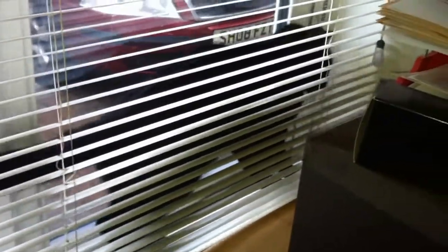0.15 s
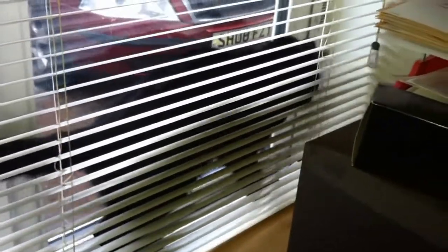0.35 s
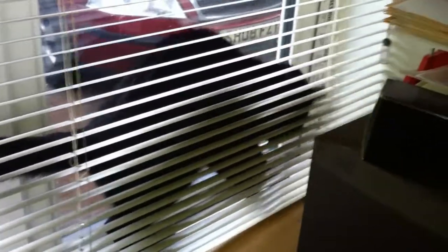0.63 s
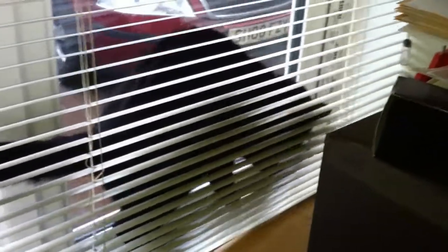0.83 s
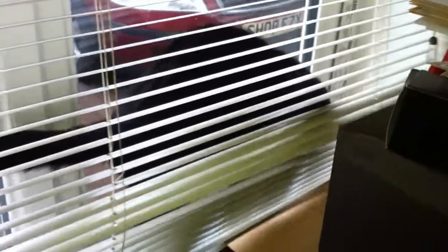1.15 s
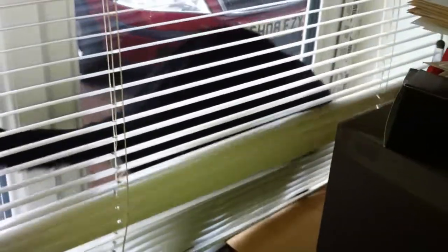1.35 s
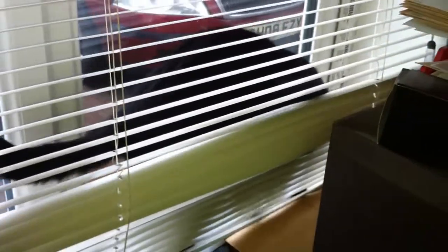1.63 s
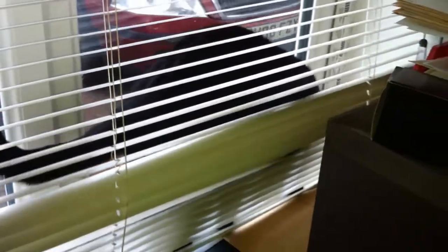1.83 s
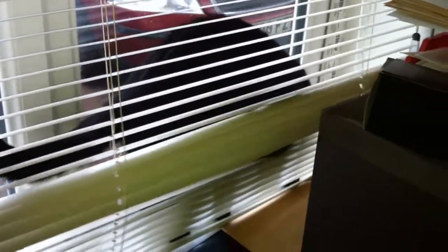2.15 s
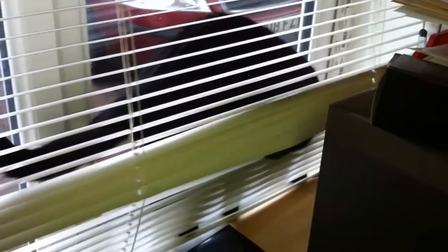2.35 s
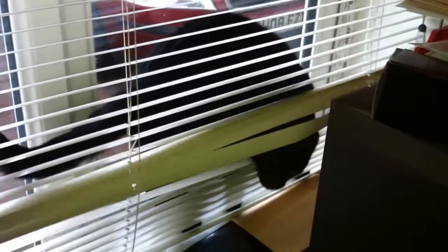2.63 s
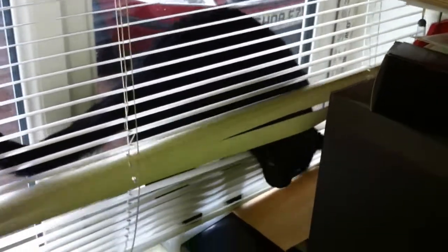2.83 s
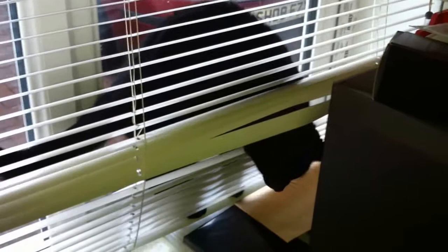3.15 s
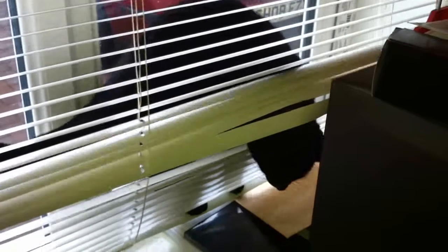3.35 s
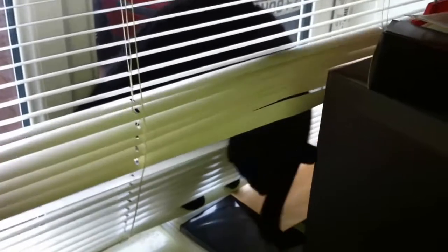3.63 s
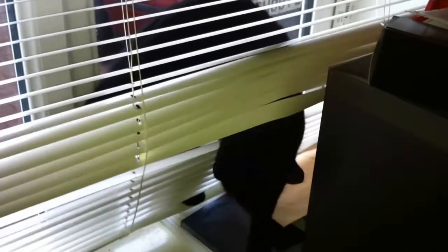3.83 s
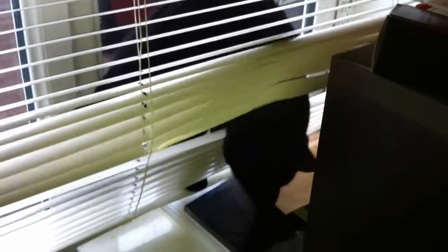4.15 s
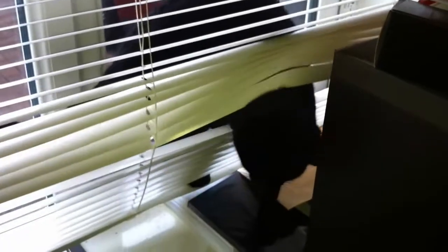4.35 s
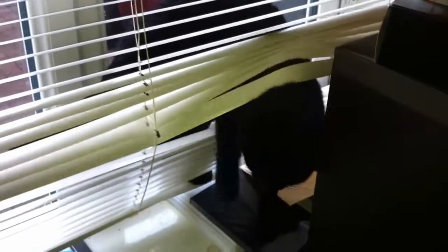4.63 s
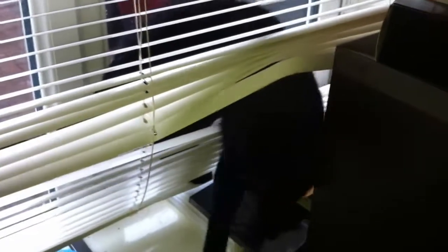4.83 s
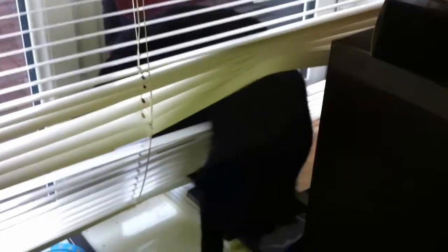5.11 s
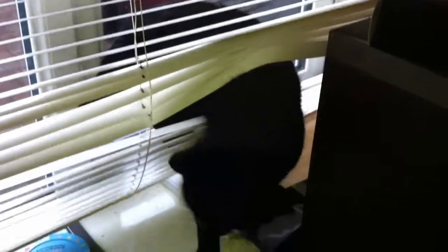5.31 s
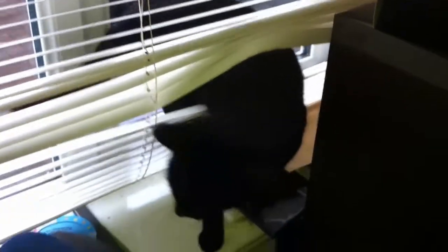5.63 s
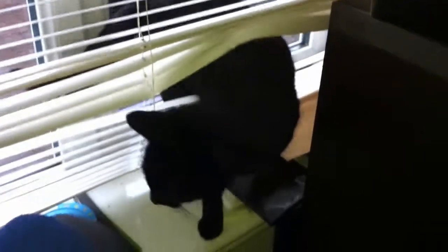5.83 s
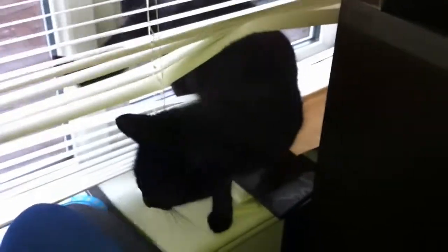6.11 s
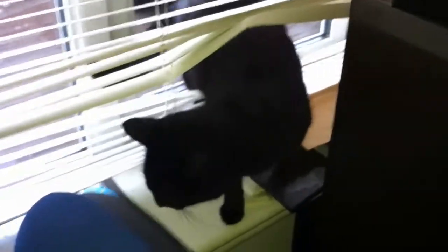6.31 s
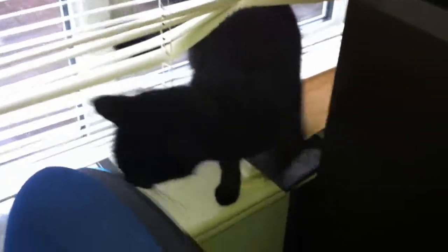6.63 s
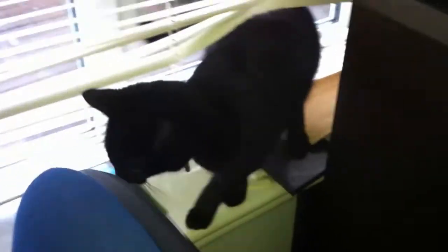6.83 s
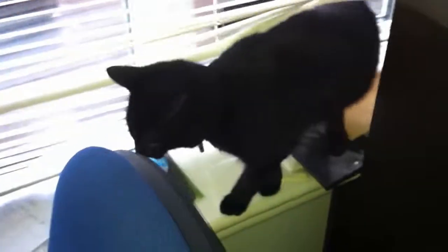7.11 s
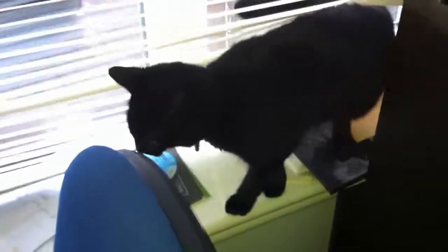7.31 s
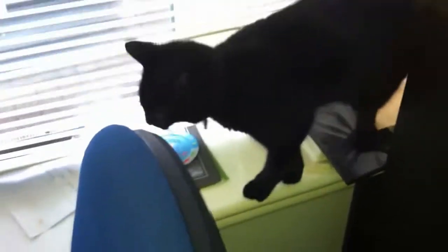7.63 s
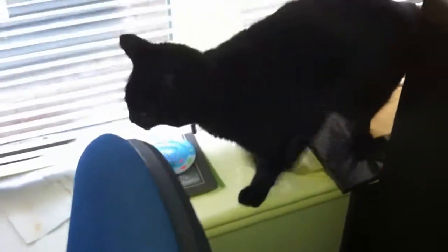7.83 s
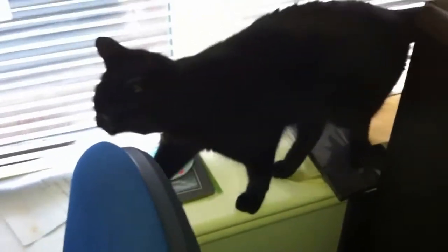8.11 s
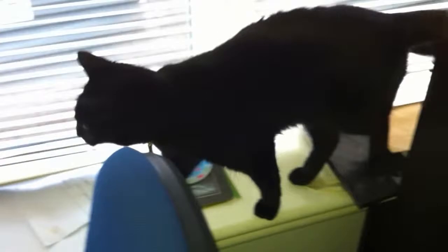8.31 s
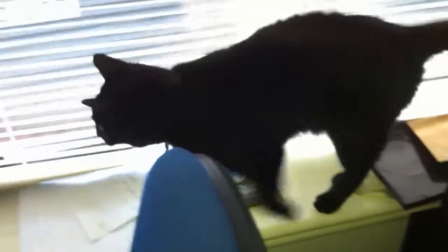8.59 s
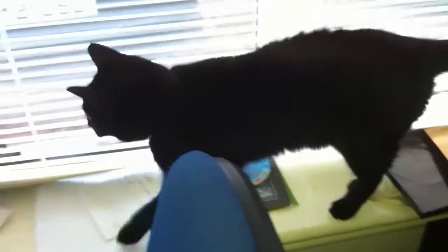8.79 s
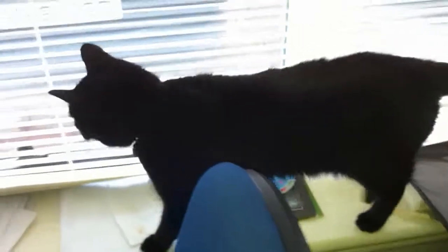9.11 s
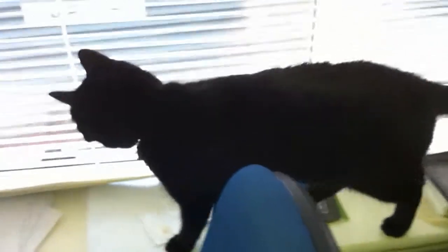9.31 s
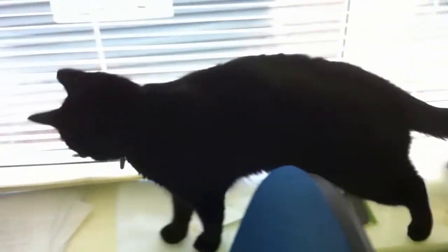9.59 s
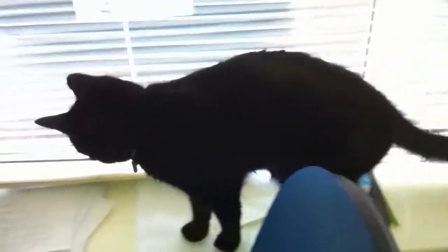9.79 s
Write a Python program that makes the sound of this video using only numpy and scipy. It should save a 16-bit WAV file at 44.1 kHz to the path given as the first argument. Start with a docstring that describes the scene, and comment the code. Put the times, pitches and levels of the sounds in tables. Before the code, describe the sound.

Close, thin metallic rattling and rough sliding of window blind slats, wooden bumps, then one sharp double clatter as a cat steps free indoors.

```python
"""Cat squeezing through a metal blind

A cat squeezes through a metal blind on a window sill and steps down onto a desk, heard close up and in mono.
Bent slats slide over its fur and each other (rough noise), snap back and ring (bursts through resonances).
The blind's rail and the paws knock on wood, and a thin whistle glides now and then.
A small room answers these sounds, over a low steady hush of filtered noise."""
import sys
import numpy as np
from scipy import signal
from scipy.fft import rfft, irfft
from scipy.io import wavfile
from scipy.ndimage import uniform_filter1d

SR = 44100
rng = np.random.default_rng(int(sys.argv[2]) if len(sys.argv) > 2 else 0)


def inscribe(sig):
    """Save sig as 16-bit PCM at rate SR to the path in sys.argv[1].

    A 1-D sig is mono; a 2-D sig holds one channel per row.
    Samples are clipped to [-1, 1] before scaling.
    """
    pcm = np.round(np.clip(np.atleast_2d(sig).T, -1, 1) * 32767)
    wavfile.write(sys.argv[1], SR, pcm.astype(np.int16))


N = 438794
TIME = np.arange(N) / SR  # seconds, whole scene
HIT = TIME[:SR // 2]  # seconds, one blow
ATTACK = int(.03 * SR)  # samples at the start of a blow that set its loudness


def amp(db):
    """Turn decibels into a gain."""
    return 10 ** (np.asarray(db) / 20)


def unit(x, size=None):
    """Scale to an average strength (rms) of 1, judged on the first `size` samples."""
    return x / np.sqrt(np.mean(x[:size] ** 2) + 1e-18)


def colour(x, points):
    """Filter x to the given (Hz, dB) outline, without any sound arriving early."""
    size = 4096
    hz, db = np.transpose(points)
    bins = np.maximum(np.fft.rfftfreq(size, 1 / SR), 1)
    outline_db = np.interp(np.log(bins), np.log(hz), db)
    # folding the cepstrum forward gives the minimum-phase filter
    cepstrum = irfft(np.log(amp(outline_db)))
    cepstrum[1:size // 2] *= 2
    cepstrum[size // 2 + 1:] = 0
    response = irfft(np.exp(rfft(cepstrum)))
    return signal.fftconvolve(x, response)[:len(x)]


def resonate(x, hz, t60):
    """Drive one resonance with x; it falls by 60 dB in t60 seconds."""
    pole = np.exp((2j * np.pi * hz - np.log(1000) / t60) / SR)
    return signal.lfilter([1], [1, -pole], x).real


def walk(rate, size=N):
    """Smooth random drift at rms 1, with `rate` new random values a second."""
    k = int(SR / rate)
    steps = np.repeat(rng.standard_normal(size // k + 1), k)
    smooth = uniform_filter1d(uniform_filter1d(steps, k), k)
    return unit(smooth[:size])


def grains(size, spread_db):
    """A dense run of tiny contacts of uneven strength."""
    strength_db = spread_db * np.minimum(rng.standard_normal(size), 2)
    return unit(rng.standard_normal(size) * amp(strength_db))


def chatter(rise_s, t60, first_db, flight_s=0):
    """A blow: a hard first contact, any flight, then a burst of contacts that dies away unevenly."""
    after = np.maximum(HIT - flight_s, 0)
    decay = amp(-60 * after / t60 + 2 * walk(297, size=len(HIT)))
    burst = (1 - np.exp(-after / rise_s)) * decay
    first = amp(first_db) * np.exp(-HIT / 0.0018)
    return grains(len(HIT), spread_db=2.0) * (burst + first)


def struck(blow, outline, hz, t60, mode_db):
    """A struck object: a broad response with one resonance standing out, at rms 1 during the attack."""
    broad = unit(colour(blow, outline), ATTACK)
    mode = unit(resonate(broad, hz, t60), ATTACK)
    return unit(broad + amp(mode_db) * mode, ATTACK)


def slips(rate, decay_s):
    """Stick and slip: strength jumps about `rate` times a second and relaxes after each jump."""
    jumps = (rng.random(N) < rate / SR) * rng.uniform(0.4, 1, N)
    return unit(signal.lfilter([1], [1, -np.exp(-1 / (decay_s * SR))], jumps))


def add(track, s, sound):
    """Mix a sound into the track at time s in seconds."""
    start = max(int(s * SR), 0)
    track[start:start + len(sound)] += sound[:N - start]


# Tone of the low hush. Each row: frequency in Hz, relative level in dB.
HUSH_TONE = [(25, -6), (60, -48), (100, -7), (160, 0.5), (280, 3), (450, -2.5), (560, -6), (1500, -8),
             (3000, -13), (9500, -15)]


def background():
    """A low hush of filtered noise, with a faint wavering hum where the noise drives a resonance."""
    noise = rng.standard_normal(N)
    hush = amp(-51) * unit(colour(noise, HUSH_TONE))
    hum = amp(-67.5) * unit(resonate(noise, hz=556.0, t60=0.15))
    return hush + hum


# Broken-off glides of a faint thin whistle.
# Each row: level in dB before the flicker, then the pitch curve as pairs of time in seconds and pitch in Hz.
WHISTLE_GLIDES = [(-61, [(8.47, 2670), (8.59, 2810)]), (-58, [(8.64, 2810), (8.72, 2890)]),
                  (-55.5, [(8.73, 2650), (8.835, 2480), (8.93, 2680)]), (-63, [(8.93, 2440), (9.22, 2286),
                  (9.53, 2690)])]


def whistle():
    """A thin wavering sine tone that glides, flickers and fades at both ends."""
    out = np.zeros(N)
    waver = 1 + 0.00564 * walk(90)
    flicker = amp(2 * walk(60))
    for db, glide in WHISTLE_GLIDES:
        s, hz = np.transpose(glide)
        progress = np.clip((TIME - s[0]) / (s[-1] - s[0]), 0, 1)
        swell = np.sqrt(np.abs(np.sin(np.pi * progress)))
        pitch = np.interp(TIME, s, hz) * waver
        out += amp(db) * swell * np.sin(2 * np.pi * np.cumsum(pitch) / SR)
    return flicker * out


# The slats' lasting ring. Each row: frequency in Hz, time to fall by 60 dB in seconds.
SLAT_RINGS = [(1628, 0.25), (1672, 0.083)]


def slat_ring(drive, size=None):
    """Neighbouring slats ring at nearly the same pitch and beat; rms 1 over the first `size` samples."""
    rings = [unit(resonate(drive, hz, t60)) for hz, t60 in SLAT_RINGS]
    return unit(sum(rings), size)


# How hard the cat presses along the blind. Each row: time in seconds, sliding level in dB.
SLIDE_PRESSURE = [(0, -56), (.3, -71), (1.45, -56), (2.3, -62), (2.6, -56.5), (3.35, -56), (3.72, -48),
                  (4.1, -53.5), (5.0, -51), (5.25, -57), (5.75, -60), (6.75, -51.5), (7.2, -55.5),
                  (7.85, -53.5), (8.3, -60.5), (9.2, -71)]
# Slats dragged over each other.
# Each row: middle in seconds, length in seconds, level in dB, sizzle in dB relative to that level.
DRAGS = [ (0.147, 0.056, -50.5, 8.5), (1.466, 0.089, -49, 4.5), (2.557, 0.083, -44, -1),
         (2.738, 0.24, -52, 5.5), (3.11, 0.17, -52.5, 7.5), (3.62, 0.027, -40, 0), (4.582, 0.023, -49, -4),
         (4.728, 0.12, -53, -9), (4.882, 0.035, -43, -7), (4.991, 0.056, -39.5, -3),
         (5.076, 0.04, -41, 1.5), (5.535, 0.077, -46, 3), (6.98, 0.013, -42, -14), (7.365, 0.033, -48.5, 0),
         (7.873, 0.064, -39.5, 10.5), (7.986, 0.025, -24.5, 5), (8.924, 0.059, -51, 1.5),
         (9.854, 0.031, -55.5, -8)]
# Tone of metal slats, also used for their blows: the clattering edges, the fine sizzle,
# the broad clang and the flexing of the whole blind. Each row: frequency in Hz, relative level in dB.
CLATTER_TONE = [(1500, -24), (2300, -7.5), (3700, 4), (4400, 4.5), (6400, -1), (8200, 2), (10000, -23.5),
                (12000, -18.5)]
SIZZLE_TONE = [(6500, -53), (9000, -4), (11700, 2.5), (16000, -3)]
CLANG_TONE = [(700, -17.5), (1200, 1), (1950, 5), (2360, 2), (2680, -5.5), (3400, -37.5)]
FLEX_TONE = [(30, -42), (110, -14.5), (320, 12), (520, 4), (800, 7), (1400, 11.5), (2000, -10.5),
             (4000, -55.5)]


def sliding():
    """Slat edges catch on fur and on each other; the friction hisses and keeps the metal humming."""
    slide = amp(np.interp(TIME, *np.transpose(SLIDE_PRESSURE)))
    catch = unit(1 + 0.62 * slips(rate=33, decay_s=0.029))
    # power of the clattering body and of the sizzling top
    body = (slide * catch) ** 2
    top = (slide * amp(3.5)) ** 2 * catch
    # a stroke is a quick run of small rubs
    rub = unit(1 + 1.2 * slips(rate=130, decay_s=0.005)) ** 2
    for s, length, db, top_db in DRAGS:
        stroke = rub * np.exp(-(2 * (TIME - s) / length) ** 2)
        body = body + stroke * amp(db) ** 2
        top = top + stroke * amp(db + top_db) ** 2
    friction = grains(N, spread_db=5.5)
    # among the fine grains, single edges let go with a tick, about 60 a second
    releases = (rng.random(N) < 60 / SR) * rng.uniform(-0.84, 1, N)
    edges = amp(-11) * unit(colour(releases, CLATTER_TONE))
    # a fast stroke skims the edge, so the ring grows only so far
    grip = np.minimum(np.sqrt(body), amp(-43.5))
    ring = amp(-8.0) * slat_ring(friction)
    clang = amp(-4.0) * unit(colour(friction, CLANG_TONE))
    sway = amp(-1.5) * unit(colour(friction, FLEX_TONE))
    rough_hiss = np.sqrt(body) * unit(colour(friction, CLATTER_TONE))
    fine_hiss = np.sqrt(top) * unit(colour(friction, SIZZLE_TONE))
    return rough_hiss + fine_hiss + grip * (ring + clang) + slide * (sway + edges)


# The rail and the paws hitting wood.
# Each row: start in seconds, blow level in dB (halved in the mix), boom pitch in Hz,
# then thump and hard contact, both in dB relative to the blow.
WOOD_KNOCKS = [ (1.248, -28.5, 351, -12, -6.5), (1.276, -27, 365, -16, -6.5), (1.304, -31.5, 368, -28, -10),
               (1.580, -34.5, 465, -7, 0.5), (1.882, -30, 205, -14, -12), (1.933, -35, 325, -20, -9),
               (2.668, -26, 276, -2.5, 0), (2.691, -29.5, 265, -9, 9), (2.725, -29, 266, -11, -26),
               (3.008, -21.5, 370, -25, -4), (3.031, -32.5, 316, -13, 2.5), (3.23, -36, 335, -8.5, -15),
               (3.582, -32, 380, -13, -10.5), (3.754, -30.5, 370, -8, -1.5), (4.667, -36, 382, -9, -3),
               (4.929, -39, 334, -20, -8), (6.590, -33.5, 460, -2, -0.5), (6.779, -43, 422, -3, -0.5),
               (6.872, -42.5, 421, -1.5, 3), (7.474, -41.5, 460, -1, 7), (7.854, -51.5, 209, 12, -16),
               (8.186, -24, 276, -23, -12.5), (8.535, -39.5, 282, -8.5, -12), (8.904, -47, 390, -1, 10)]
# Tone of each part of a knock: deep thump, boom, hollow knock, dry clack and sharp crack.
# Each row: frequency in Hz, relative level in dB.
THUMP_TONE = [(90, -35), (135, -9.5), (175, 10.5), (240, -5), (400, -52)]
BOOM_TONE = [(110, -44), (170, 1), (360, 1), (470, -7.5), (700, -35)]
KNOCK_TONE = [(350, -22), (530, 4), (780, -2.5), (1050, -7.5), (1500, -45)]
CLACK_TONE = [(850, -32), (1150, 4), (1350, 2.5), (1620, 2), (2200, -9.5), (3000, -17.5), (9000, -44)]
CRACK_TONE = [(1200, -13), (2100, -2), (11000, -19)]
# the hollow knock lies about an octave over the boom; a higher-pitched spot clacks more
KNOCK_RATIO, CLACK_DB, CLACK_AT_HZ, CLACK_DB_PER_OCTAVE = 2.1, -4, 361, 13
# a stiff, high-pitched spot gives a shorter blow with a sharp crack
STIFF_ABOVE_HZ, CRACK_DB = 420, -3


def knocks():
    """Blows on wood thump, boom, knock and clack, pitched by the spot that is hit; stiff spots crack."""
    out = np.zeros(N)
    for s, db, boom_hz, thump_db, hard_db in WOOD_KNOCKS:
        # a light paw settles slowly, a heavy blow lands at once
        strength_db = db + max(hard_db, 0)
        rise_s = np.clip(0.0012 * amp(-1.1 * (strength_db + 31)), .0012, .02)
        stiff = boom_hz > STIFF_ABOVE_HZ
        blow = chatter(rise_s, t60=0.105 if stiff else 0.145, first_db=3 if stiff else -5)
        thump = amp(thump_db) * unit(colour(blow, THUMP_TONE), ATTACK)
        boom = struck(blow, BOOM_TONE, boom_hz, t60=0.037, mode_db=1.5)
        knock = struck(blow, KNOCK_TONE, KNOCK_RATIO * boom_hz, t60=0.014, mode_db=4.5)
        clack_db = CLACK_DB + CLACK_DB_PER_OCTAVE * np.log2(boom_hz / CLACK_AT_HZ)
        clack = amp(clack_db) * unit(colour(blow, CLACK_TONE), ATTACK)
        crack = stiff * amp(CRACK_DB) * unit(colour(blow, CRACK_TONE), ATTACK)
        hard = amp(hard_db) * (knock + clack + crack)
        add(out, s, amp(db) / 2 * (thump + boom + hard))
    return out


# Bending modes of a slat.
# Each row: frequency in Hz at pitch ratio 1, relative level in dB, time to fall by 60 dB in seconds.
SLAT_MODES = [(912, -7.5, 0.026), (1926, 5.5, 0.038), (2135, -2, 0.074), (3380, -4.5, .06),
              (3950, -2, 0.045), (6520, -14, .06), (7600, -6, .05)]


def slat_clang(blow, pitch):
    """The bent span clangs, a broad note plus bending modes; it is caught again at once, which damps it."""
    drive = blow * np.exp(-HIT / 0.023)
    modes = sum(amp(db) * unit(resonate(drive, hz * pitch, t60), ATTACK) for hz, db, t60 in SLAT_MODES)
    broad = unit(colour(drive, CLANG_TONE), ATTACK)
    return unit(broad + amp(-3.5) * unit(modes, ATTACK), ATTACK)


# Slats tapping lightly in place.
# Each row: start in seconds, clatter level in dB, sizzle in dB relative to the clatter.
LIGHT_TAPS = [ (0.043, -51, -1), (0.567, -46, -7), (0.755, -53.5, -12), (0.933, -56.5, 2),
              (1.285, -52.5, -12), (1.405, -52, 3), (2.035, -49, -11), (2.397, -46.5, -16),
              (2.528, -50, -12), (3.522, -43, -2), (3.814, -54, 14), (4.939, -50, -9), (5.429, -46.5, 7.5),
              (6.696, -48.5, 8), (7.523, -46, 4.5), (9.757, -51.5, -14)]


def ticks():
    """A slat that stays in place taps its neighbour: no flight, a short chatter and a little ring."""
    out = np.zeros(N)
    for s, db, sizzle_db in LIGHT_TAPS:
        blow = chatter(rise_s=0.0017, t60=0.14, first_db=-2.5)
        metal = amp(-8.5) * (slat_ring(blow, ATTACK) + slat_clang(blow, 1))
        clatter = unit(colour(blow, CLATTER_TONE), ATTACK)
        sizzle = amp(sizzle_db) * unit(colour(blow, SIZZLE_TONE), ATTACK)
        add(out, s, amp(db) * (clatter + sizzle + metal))
    return out


# Slats snapping together.
# Each row: start in seconds, clatter level in dB, then clang, ring and sizzle in dB relative to the clatter,
# first contact in dB relative to the burst after it, and pitch ratio of the bent span.
SNAPS = [ (1.165, -39, -16, -7, -8, 11, 0.71), (1.671, -34, -10, -7, -4.5, -10, 1.2),
         (3.653, -24, 1.5, -9.5, -2.5, 8.5, 0.99), (4.220, -48.5, 3, -16, -14, 7, 1),
         (4.3245, -31.5, 7, -4, -3, -6, 1.01), (5.402, -37.5, -0.5, -6.5, -2, -1, 0.73),
         (6.366, -37.5, -6.5, -12, 3.5, -1, 0.79), (6.991, -30, 2, -6.5, -1, 0, 1.02),
         (7.472, -44, -3, -2, 0, -4, 1), (7.973, -22.5, -2, -12.5, 3.5, -10, 1.104),
         (8.0414, -23.5, -21, -25, 0, 11.5, 0.81), (8.321, -37, -7, -3, -4.5, -2, 1),
         (9.658, -35, -8.5, -5, -4.5, -8, 1.05)]
FLIGHT_S = 0.0038  # seconds between a slat's first tap and its full landing
# while the blind lies bent over the cat's back (from s, to s), each landing flexes all of it;
# the flex levels are relative to the clatter
BENT_S, FLEX_BENT_DB, FLEX_FREE_DB = (3.6, 6.8), -2, -18
# a slat caught on its stiff edge hardly clangs; instead a bright resonance stands out
EDGE_BELOW_CLANG_DB, EDGE_HZ, EDGE_DB = -19.5, 6670, 15


def clicks():
    """A slat slips free, taps its neighbour, clangs and chatters against it, then rings on."""
    out = np.zeros(N)
    for s, db, clang_db, ring_db, sizzle_db, first_db, pitch in SNAPS:
        blow = chatter(rise_s=0.0014, t60=0.14, first_db=first_db, flight_s=FLIGHT_S)
        if clang_db < EDGE_BELOW_CLANG_DB:
            clatter = struck(blow, CLATTER_TONE, EDGE_HZ, t60=0.0022, mode_db=EDGE_DB)
        else:
            clatter = unit(colour(blow, CLATTER_TONE), ATTACK)
        sizzle = amp(sizzle_db) * unit(colour(blow, SIZZLE_TONE), ATTACK)
        flex_db = FLEX_BENT_DB if BENT_S[0] < s < BENT_S[1] else FLEX_FREE_DB
        landing = blow * (HIT > FLIGHT_S)
        flex = amp(flex_db) * unit(colour(landing, FLEX_TONE), ATTACK)
        clang = amp(clang_db) * slat_clang(blow, pitch)
        ring = amp(ring_db) * slat_ring(blow, ATTACK)
        add(out, s, amp(db) * (clatter + sizzle + flex + clang + ring))
    return out


def room(x, wet_db, t60_low, t60_high):
    """Diffuse reflections of a small furnished room, as fading noise; the treble dies first."""
    noise = rng.standard_normal(len(HIT))
    low = signal.sosfilt(signal.butter(1, 5000, fs=SR, output="sos"), noise)
    high = noise - low
    fading = low * amp(-60 * HIT / t60_low) + high * amp(-60 * HIT / t60_high)
    tail = fading * (1 - np.exp(-HIT / 0.014))
    return x + amp(wet_db) * signal.fftconvolve(x, tail / np.linalg.norm(tail))[:N]


def scene():
    """All sources in the room, over the hush, the same in both channels."""
    sources = clicks() + ticks() + knocks() + sliding() + whistle()
    mono = room(sources, wet_db=-9.0, t60_low=0.23, t60_high=0.12) + background()
    return np.array([mono, mono])


def record(dry):
    """The recorder cuts the top, steeply above 15900 Hz."""
    return signal.sosfilt(signal.ellip(10, .2, 70, 15900, fs=SR, output="sos"), dry)


dry = scene()
out = record(dry)
inscribe(out)
```